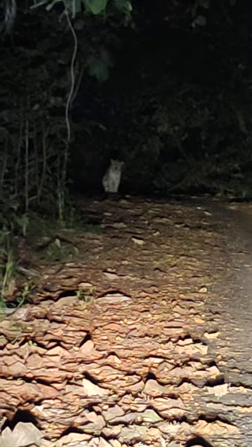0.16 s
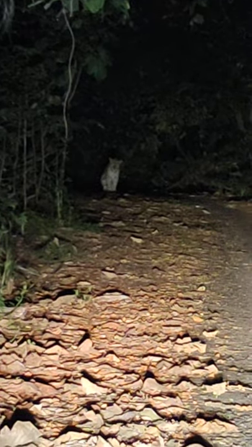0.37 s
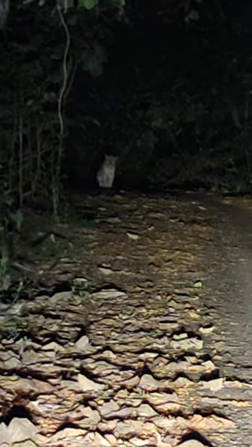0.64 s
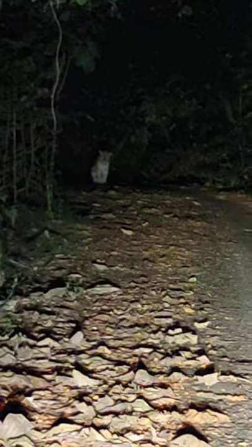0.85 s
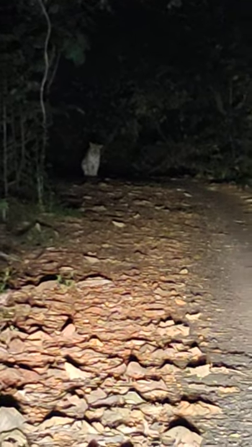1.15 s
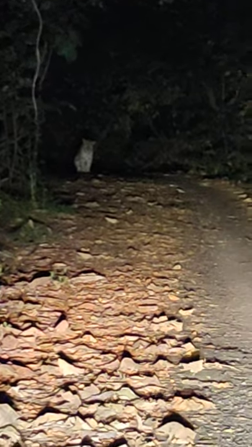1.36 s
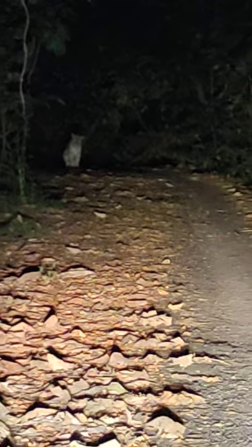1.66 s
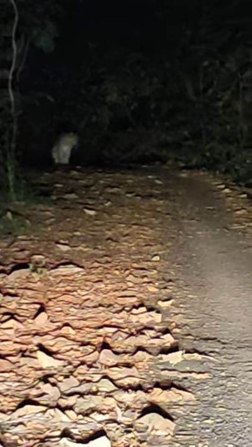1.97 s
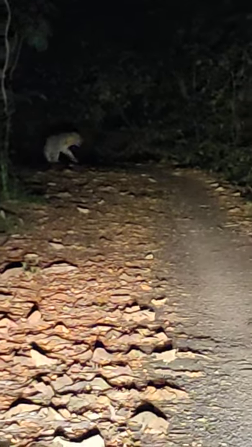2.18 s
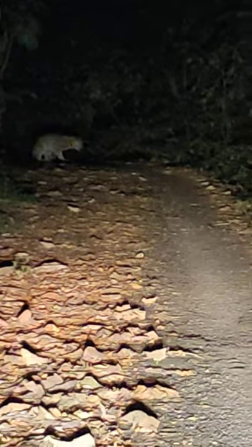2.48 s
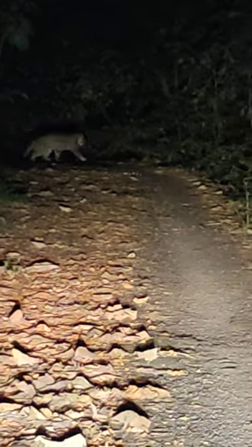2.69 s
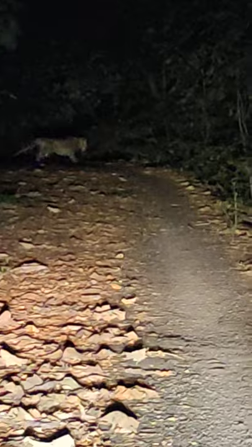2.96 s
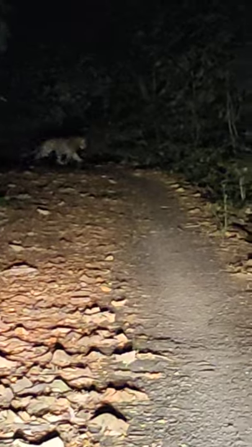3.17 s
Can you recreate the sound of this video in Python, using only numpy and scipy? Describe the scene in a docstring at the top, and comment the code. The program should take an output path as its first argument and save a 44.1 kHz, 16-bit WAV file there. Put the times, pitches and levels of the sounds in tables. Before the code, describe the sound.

A single-cylinder motorcycle idles close to a phone microphone on a dark forest track, thumping about ten times a second over a soft rattle and hum; two small hard clacks come early, the second brighter.

```python
"""A single-cylinder motorcycle idles on a forest track, close beside a phone with two microphone ports.
Each firing comes as a valve tick, then a casing knock, then a thump: two puffs of gas ring the exhaust.
Under them the frame rumbles as noise in low resonances, tiny rattles ring the casing and a panel hums.
At 0.61 s and 1.03 s a small hard object clacks close by: short noisy contacts ring its modes.
Faint hiss pulses with the firings; all but the hiss reaches the left port a little later."""
import sys
import numpy as np
from scipy import signal
from scipy.fft import rfft, irfft
from scipy.io import wavfile
from scipy.ndimage import uniform_filter1d

SR = 44100
rng = np.random.default_rng(int(sys.argv[2]) if len(sys.argv) > 2 else 0)


def materialize(psi):
    """Save the field psi as 16-bit PCM at rate SR to the path in sys.argv[1].

    A 1-D psi becomes a single channel; in a 2-D psi each row is a channel.
    """
    bounded = np.clip(np.atleast_2d(psi).T, -1, 1)
    quanta = np.round(bounded * 32767).astype(np.int16)
    wavfile.write(sys.argv[1], SR, quanta)


N = 146853
T = np.arange(N) / SR  # time [s]


def undb(db):
    """Amplitude gain of a level in dB."""
    return 10 ** (np.asarray(db) / 20)


def puff(start, length):
    """A smooth push, a squared half sine whose area over time [s] is half a unit."""
    return np.sin(np.pi * np.clip((T - start) / length, 0, 1)) ** 2 / length


def burst(start, rise):
    """A sudden swell that crests at 1 after the rise time [s] and dies away."""
    u = np.maximum(T - start, 0) / rise
    return np.e * u * np.exp(-u)


def ring(x, hz, t60):
    """One mode driven by x: a decaying sine that loses 60 dB in t60 seconds."""
    pole = np.exp(2j * np.pi * hz / SR - np.log(1000) / (t60 * SR))
    return signal.lfilter([1], [1, -pole], x).imag


def band(x, hz, width):
    """A resonance applied twice, each pass 1.5 times as wide, brought to unit rms."""
    b, a = signal.iirpeak(hz, hz / width / 1.5, SR)
    once = signal.lfilter(b, a, x)
    twice = signal.lfilter(b, a, once)
    return twice / np.std(twice)


def walk(rate):
    """Random levels, new ones arriving at this rate [1/s], smoothed into slopes; spread near 1."""
    hold = int(SR / rate)
    steps = np.repeat(rng.standard_normal(N // 500), hold)[:N]
    return 1.2 * uniform_filter1d(steps, hold)


# Phase of the left port against the right: (frequency [Hz], lead [rad]); negative is later
PORT_LEAD = [(0, 0), (690, -2.5), (1380, -3.6), (2070, -5.5), (2930, -6.7), (5250, -7.6), (9000, -10),
             (16000, -15.6)]
# Level of the left port against the right: (frequency [Hz], left minus right [dB])
PORT_BALANCE = [(200, -1.5), (700, -3), (2400, -2), (4400, -3), (6000, -6), (9000, -2), (15000, -3)]


def ports(right, other, alike):
    """The right port as is; the left one later, quieter and partly unrelated."""
    hz = np.arange(N // 2 + 1) * SR / N
    phase_hz, lead = np.array(PORT_LEAD).T
    level_hz, balance_db = np.array(PORT_BALANCE).T
    gain = undb(np.interp(np.log(hz + 1), np.log(level_hz), balance_db))
    turn = np.exp(1j * np.interp(hz, phase_hz, lead)) * gain
    alike = np.clip(alike, 0, 1)
    mixed = alike * right + np.sqrt(1 - alike ** 2) * other
    left = irfft(rfft(mixed) * turn, N)
    return np.array([left, right])


# Engine firings, levels before the gains of each layer:
# (thump crest time [s], thump level [dB], valve tick level [dB], casing knock level [dB])
FIRINGS = [(0.028, -26.5, -53.0, -54.5), (0.1205, -28, -54.5, -63.5), (0.2143, -28, -61.5, -48.5),
           (0.3047, -28, -54, -54.5), (0.3985, -27.5, -59.5, -69.5), (0.4956, -31, -57, -59),
           (0.5951, -27.5, -60, -54.5), (0.6949, -27, -50, -57.5), (0.7928, -25.5, -55, -55.5),
           (0.8904, -26, -55.5, -65.5), (0.9866, -27.5, -51.5, -69.5), (1.079, -27.5, -55.5, -53),
           (1.1751, -27.5, -55.5, -54), (1.268, -27, -57.5, -55), (1.3621, -31, -52.5, -57.5),
           (1.4573, -27, -58, -55.5), (1.5528, -26, -52.5, -66.5), (1.6487, -29.5, -55.5, -61.5),
           (1.7429, -28.5, -59, -58), (1.8407, -29.5, -59, -54.5), (1.9393, -28.5, -53, -60),
           (2.043, -27, -50, -65.5), (2.1449, -27.5, -60.5, -50), (2.245, -26.5, -52, -47.5),
           (2.3403, -26, -65, -52.5), (2.4352, -27.5, -53, -53), (2.5279, -27, -52.5, -49),
           (2.6184, -28.5, -49, -55), (2.7111, -26.5, -59, -60), (2.8016, -25.5, -74, -53),
           (2.8967, -27, -71.5, -63), (2.9913, -26.5, -65.5, -55), (3.0894, -31, -52.5, -59),
           (3.1847, -28.5, -50.5, -56.0), (3.2807, -27.5, -61, -65.5)]
# Exhaust pipe modes: (frequency [Hz], 60 dB decay [s], level [dB], signed factor)
PIPE_MODES = [(44, 0.15, -5.5, 1), (83.7, 0.12, 5, -0.77), (125.6, 0.28, -12.5, -0.91)]
BLOW_LEAD_S, BLOW_S = 0.0088, 0.0047  # the valve opens before the crest; length of the first puff
# The piston then pushes out the rest, following part of each firing's strength [dB per dB]
PUSH_AFTER_S, PUSH_S, PUSH_DB, PUSH_FOLLOWS = 0.01739, 0.0096, -30.5, 0.29
DIP_LEAD_S, DIP_S, DIP_DB = 0.0035, 0.0026, -41  # a faint dip in pressure before the first puff
MUFFLER_HZ = 213
THUMP_DB, THUMP_LEFT_DB = 8, -0.5  # gain of both ports; extra gain of the left
THUMP_LAG_S = 0.00043  # left port after the right


def exhaust():
    """Two gas puffs per firing, rounded by the muffler's low-pass, ring the modes of the pipe."""
    crest, blow_db = np.array(FIRINGS).T[:2]
    push_db = PUSH_DB + PUSH_FOLLOWS * (blow_db - blow_db.mean())

    def port(lag):
        """The thumps as heard at a port that lags by this many seconds."""
        gas = 0
        for opens, blow, push in zip(crest + lag - BLOW_LEAD_S, blow_db, push_db):
            gas = gas + undb(blow) * puff(opens, BLOW_S)
            gas = gas + undb(push) * puff(opens + PUSH_AFTER_S, PUSH_S)
            gas = gas - undb(DIP_DB) * puff(opens - DIP_LEAD_S, DIP_S)
        b, a = signal.butter(2, MUFFLER_HZ, fs=SR)
        gas = signal.lfilter(b, a, gas / SR)
        return sum(sign * undb(db) * ring(gas, hz, t60) for hz, t60, db, sign in PIPE_MODES)

    left = undb(THUMP_LEFT_DB) * port(THUMP_LAG_S / 2)
    right = port(-THUMP_LAG_S / 2)
    return undb(THUMP_DB) * np.array([left, right])


# Casing resonances, widths before the sharpness limit:
# (frequency [Hz], width [Hz], steady level [dB], share of tick, share of knock)
CASING_MODES = [(526.5, 100, -77.5, 1, .1), (957.7, 59, -70.5, 0.35, .2), (1049.6, 54, -68, 0.4, 0.38),
                (1370, 120, -65, 0.55, 0.067), (1708.5, 110, -67.5, 0.67, .1), (1879, 89, -71.5, 0.56, .1),
                (2026, 120, -66, 0.83, .1), (2266, 250, -70, 1, 0.071), (2561, 150, -71.5, 0.72, 0.052),
                (2923, 220, -73.5, 0.36, 0.26), (3257, 300, -81, 0.3, .3), (3783, 680, -77, 0, 0.17),
                (4233, 230, -77.5, 0.19, 0.15), (4673, 260, -81, 0.1, .4), (5210, 530, -86, .3, .3),
                (5884, 620, -84.5, 0.11, .3), (6480, 550, -94.5, 0.067, .3), (7340, 430, -90.5, .2, 0.37)]
TICK_LEAD_S, TICK_RISE_S = 0.032, 0.008  # start before the thump's crest
KNOCK_LEAD_S, KNOCK_S = 0.013, 0.009  # KNOCK_S: rise on the casing, push length on the panel
TICK_DB, KNOCK_DB = 62, 67.5  # added to the firing levels to set swells over the steady rattle
RATTLES_PER_S, RATTLE_SPREAD_DB = 3000, 0.5
WANDER_DB, WANDER_PER_S = 2.2, 20
SHARPNESS = 16  # resonances are no wider than their frequency over this
SPREAD_S = 0.008  # parts of the casing are struck up to this much early or late
ALIKE = 0.66  # likeness of casing and panel at the two ports


def casing():
    """Dense tiny rattles of valve gear and chain ring the casing, swelling at each tick and knock."""
    tick = sum(undb(db + TICK_DB) * burst(s - TICK_LEAD_S, TICK_RISE_S) for s, _, db, _ in FIRINGS)
    knock = sum(undb(db + KNOCK_DB) * burst(s - KNOCK_LEAD_S, KNOCK_S) for s, _, _, db in FIRINGS)
    hit = rng.random((2, N)) < RATTLES_PER_S / SR
    strength = rng.standard_normal((2, N))
    extra_db = RATTLE_SPREAD_DB * rng.exponential(size=(2, N))
    rattle = hit * strength * undb(extra_db)
    out = 0
    for hz, width, db, on_tick, on_knock in CASING_MODES:
        swell = np.sqrt(1 + (on_tick * tick) ** 2 + (on_knock * knock) ** 2)
        drive = undb(WANDER_DB * walk(WANDER_PER_S)) * swell
        rung = band(rattle * drive, hz, min(width, hz / SHARPNESS))
        shift = int(SPREAD_S * SR * rng.uniform(-1, 1))
        out = out + undb(db) * np.roll(rung, shift, axis=1)
    return ports(*out, ALIKE)


# Level of the panel's hum, with some sudden jumps, before its pulsing with the firings:
# (time [s], level [dB])
PANEL_LEVEL = [(0.0, -53.5), (0.08, -68), (0.59, -56.5), (0.95, -70.5), (1.06, -58.5), (1.86, -67.5),
               (1.92, -55.5), (2.4, -72.5), (2.42, -59), (2.73, -68), (3.09, -59.5), (3.33, -68)]
PANEL_HZ, PANEL_T60_S = 790, 0.09
KNOCK_RING_DB = 2.5
HUM_DIP_DB = -9  # fade of the hum between knocks, from its swell at each


def panel():
    """Each knock rings a panel with a soft start; it hums as narrow noise that fades in between."""
    phase = 2 * np.pi * rng.random((len(FIRINGS), 2))
    push = np.zeros((2, N))
    for (crest, _, _, db), start_phase in zip(FIRINGS, phase):
        shape = undb(db) * puff(crest - KNOCK_LEAD_S, KNOCK_S)
        for side in range(2):
            push[side] += shape * np.sin(2 * np.pi * PANEL_HZ * T + start_phase[side])
    knocks = undb(KNOCK_RING_DB) * ring(2 * push / SR, PANEL_HZ, PANEL_T60_S)
    swell = sum(burst(crest - 2 * KNOCK_LEAD_S, 0.022) for crest, _, _, _ in FIRINGS)
    hum_db = np.interp(T, *np.array(PANEL_LEVEL).T) + HUM_DIP_DB * (0.5 - swell)
    hum = undb(hum_db) * band(rng.standard_normal((2, N)), PANEL_HZ, 50)
    return ports(*(hum + knocks), ALIKE)


# Uneven level of the frame's rumble, surging and dropping, before the resonance levels:
# (time [s], level [dB])
RUMBLE_LEVEL = [(0.0, -65), (0.21, -63), (0.55, -73), (0.67, -62.5), (0.72, -73), (1.4, -71.5),
                (1.45, -63.5), (1.61, -77.5), (1.73, -68.5), (1.82, -59.5), (1.88, -75.5), (2.01, -63),
                (2.16, -70), (2.75, -75), (2.89, -66), (2.93, -70), (3.27, -76), (3.33, -68)]
# Frame resonances: (frequency [Hz], width [Hz], relative level [dB], share of the swells followed)
FRAME_MODES = [(199, 81, 3, 0.69), (260, 35, -1.5, .8), (299.5, 29.5, 1, 1), (390, 29, -3, .8),
               (419.5, 70, -6.5, 1)]


def frame():
    """The frame shudders: noise in a few low resonances, each wandering in level."""
    level_db = np.interp(T, *np.array(RUMBLE_LEVEL).T)
    mean_db = level_db.mean()
    shake = rng.standard_normal((2, N))
    out = 0
    for hz, width, db, share in FRAME_MODES:
        mode_db = db + mean_db + share * (level_db - mean_db) + 3.5 * walk(19)
        out = out + undb(mode_db) * band(shake, hz, width)
    return ports(*out, 0.89)


# Clacks: (start time [s], level [dB], contact length [s], treble tilt [dB per octave])
CLACKS = [(0.6108, -40, 0.0047, -4), (1.0314, -35.5, 0.0022, 1.5)]
# Modes of the small hard object, before the tilt: (frequency [Hz], 60 dB decay [s], level [dB])
OBJECT_MODES = [(910, 0.018, -8), (1430, .008, 1), (2130, 0.0073, -2.5), (2780, 0.01, 0.5),
                (3140, 0.0071, -13), (4310, 0.016, -1), (4720, 0.0061, -3.5), (5750, 0.0089, 0),
                (7300, 0.024, -11.5), (9250, 0.0084, -40), (11300, 0.0063, -18), (14000, 0.0075, -15)]


def clacks():
    """A few ms of scraping contact, as noise, ring a small hard object."""
    out = 0
    for start, db, length, tilt_db in CLACKS:
        contact = burst(start, length / 2) * rng.standard_normal((2, N))
        rung = 0
        for hz, t60, mode_db in OBJECT_MODES:
            gain = undb(mode_db + tilt_db * np.log2(hz / 3000))
            # evens out the build-up of long modes
            rung = rung + gain * ring(contact, hz, t60) / np.sqrt(t60 * SR)
        out = out + undb(db) * rung
    return ports(*out, 0.77)


HISS_DB, HISS_PULSE_DB = -86, 6.5  # level of the lowest band; rise of the noise at each firing


def hiss():
    """Faint treble hiss in three bands, unrelated at the two ports, breathes with the firings."""
    pulse = sum(burst(crest - 0.02, 0.005) for crest, _, _, _ in FIRINGS)
    noise = rng.standard_normal((2, N)) * undb(HISS_PULSE_DB * pulse + 1.8 * walk(18))
    upper = band(noise, 11250, 2400) + band(noise, 14300, 960)
    return undb(HISS_DB) * (band(noise, 7600, 3600) + undb(-6.5) * upper)


def scene():
    """The idling motorcycle, the clacks close by and the hiss, at the two ports."""
    return exhaust() + casing() + panel() + frame() + clacks() + hiss()


LOW_CUT_HZ, TOP_HZ = 39.6, 15900


def record(dry):
    """The phone cuts the deep bass and, steeply, the top."""
    low_cut = signal.butter(4, LOW_CUT_HZ, "high", fs=SR, output="sos")
    top_cut = signal.ellip(8, 0.2, 70, TOP_HZ, fs=SR, output="sos")
    return signal.sosfilt(top_cut, signal.sosfilt(low_cut, dry))


dry = scene()
out = record(dry)
materialize(out)
```